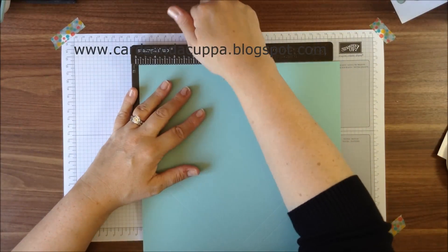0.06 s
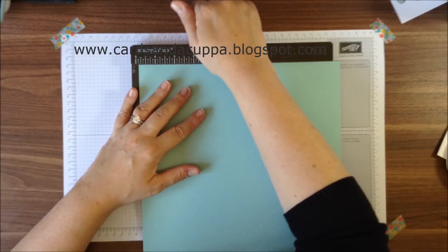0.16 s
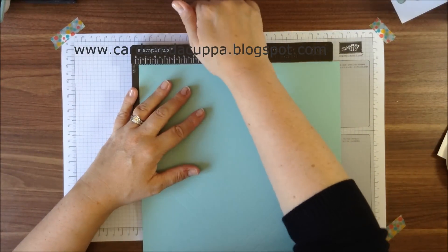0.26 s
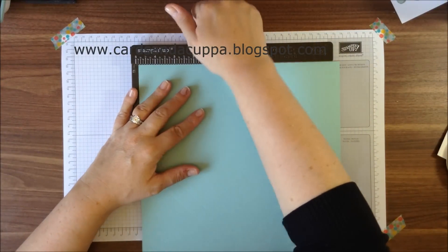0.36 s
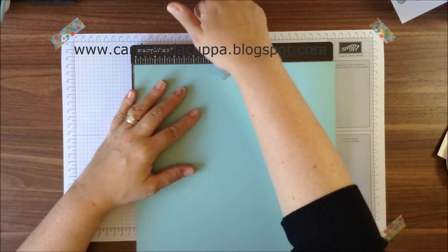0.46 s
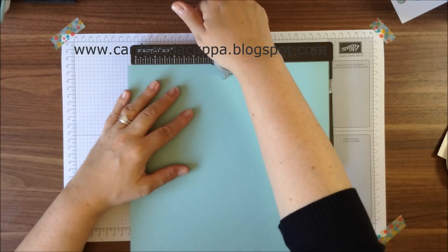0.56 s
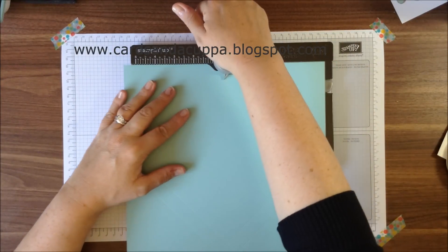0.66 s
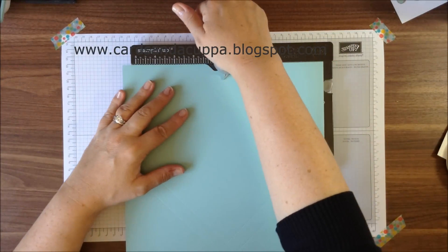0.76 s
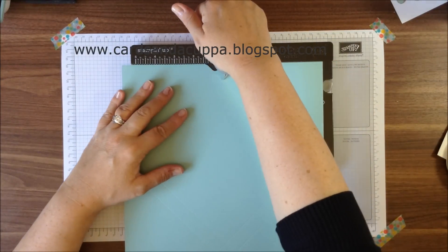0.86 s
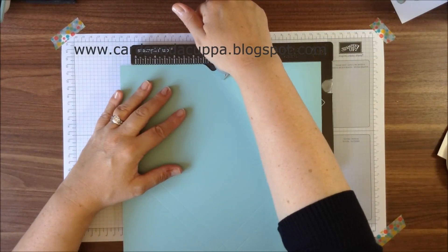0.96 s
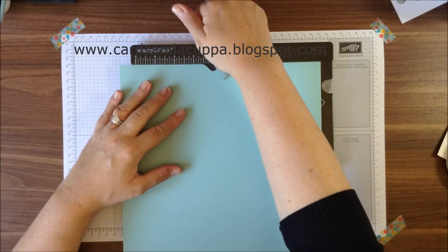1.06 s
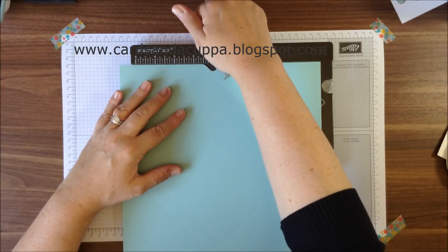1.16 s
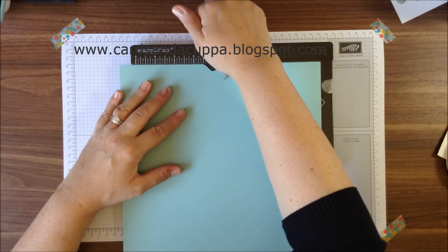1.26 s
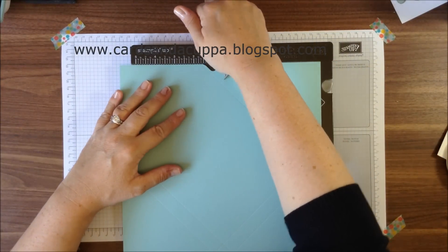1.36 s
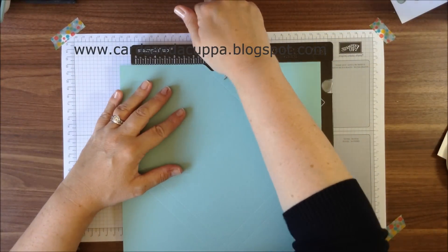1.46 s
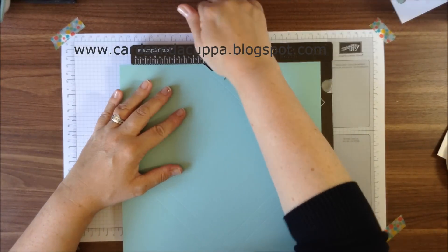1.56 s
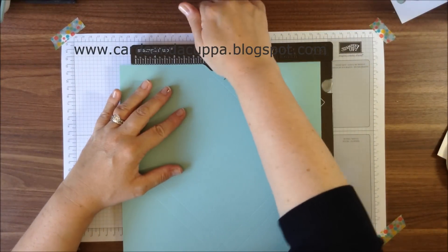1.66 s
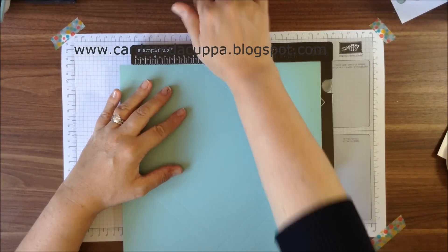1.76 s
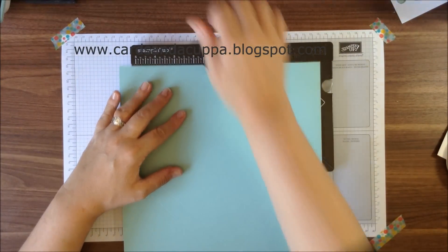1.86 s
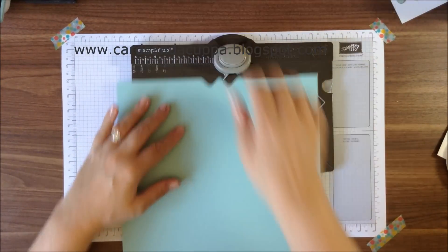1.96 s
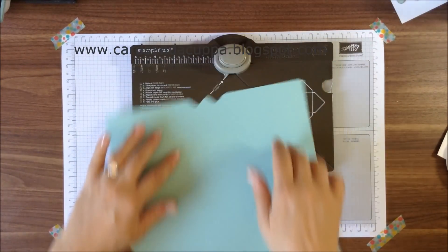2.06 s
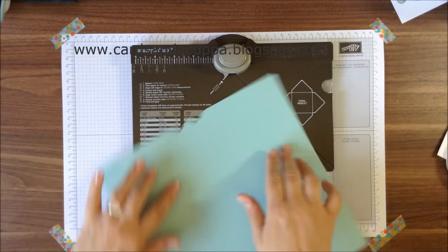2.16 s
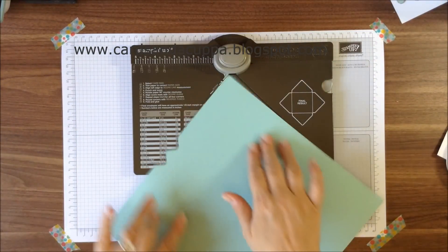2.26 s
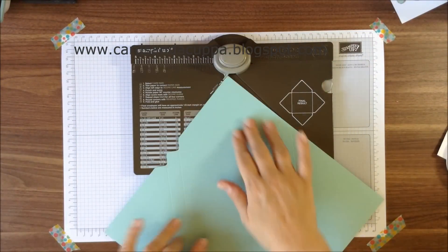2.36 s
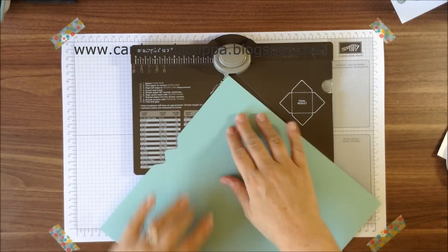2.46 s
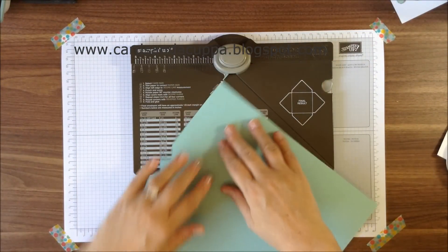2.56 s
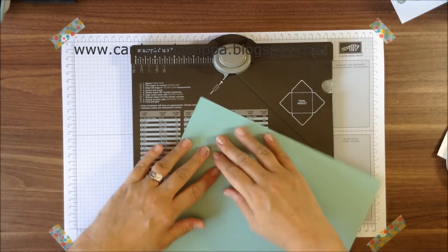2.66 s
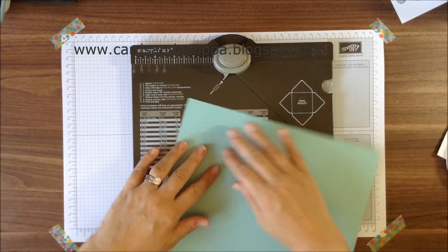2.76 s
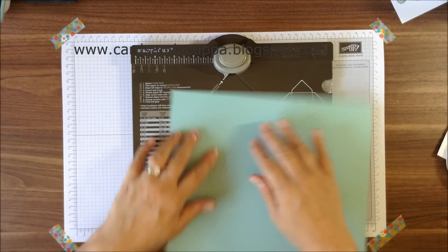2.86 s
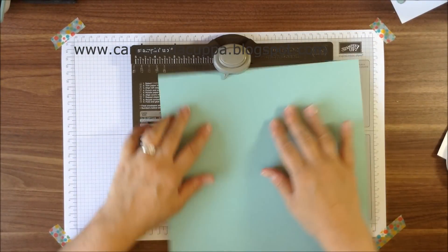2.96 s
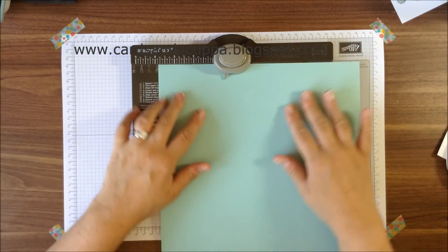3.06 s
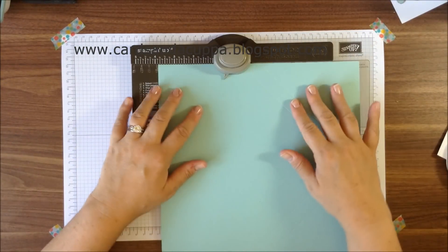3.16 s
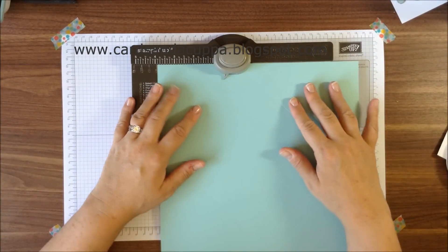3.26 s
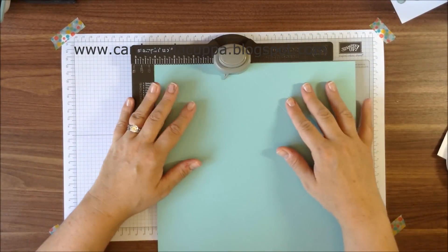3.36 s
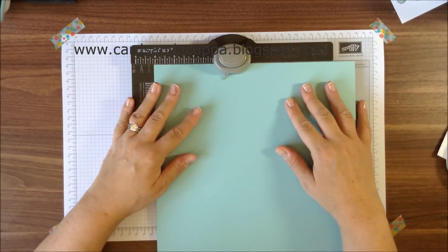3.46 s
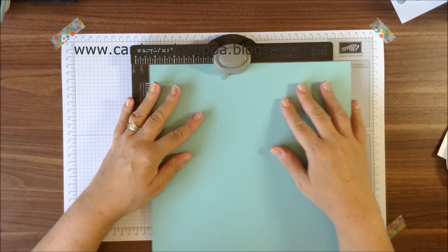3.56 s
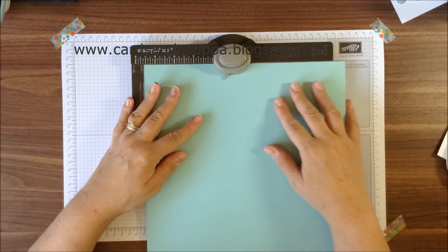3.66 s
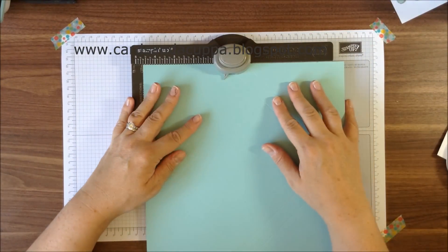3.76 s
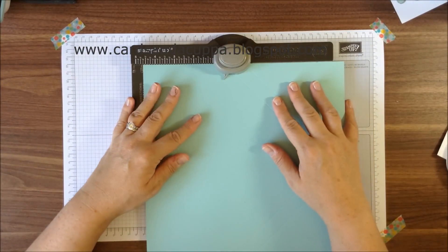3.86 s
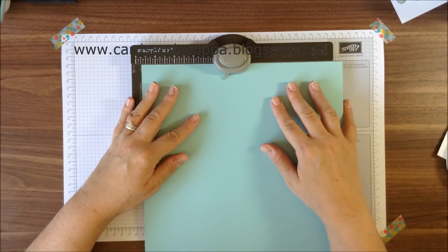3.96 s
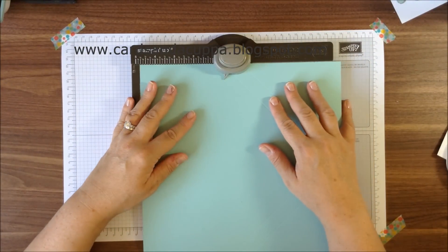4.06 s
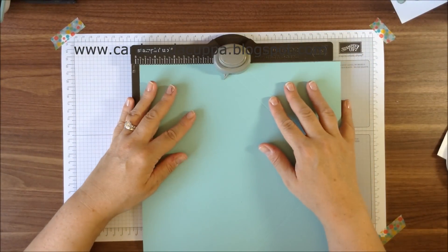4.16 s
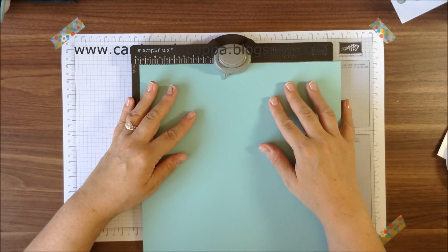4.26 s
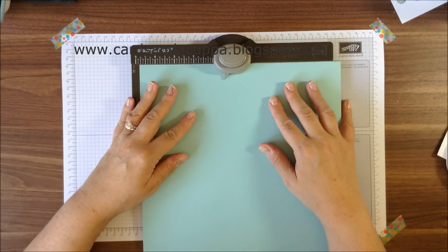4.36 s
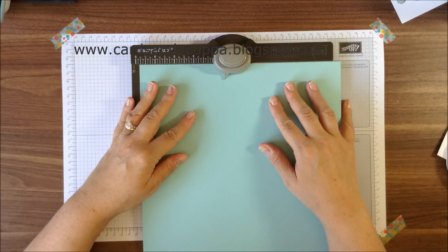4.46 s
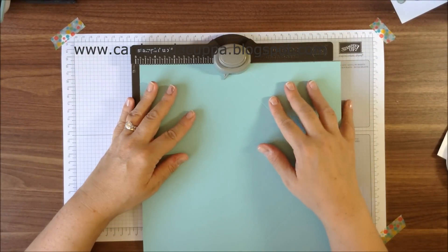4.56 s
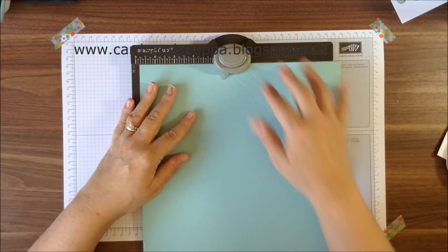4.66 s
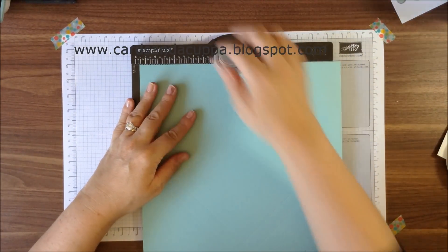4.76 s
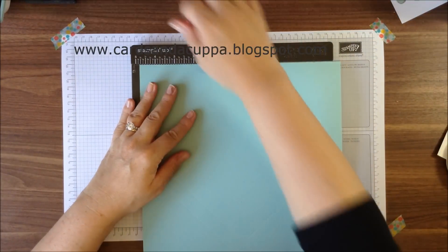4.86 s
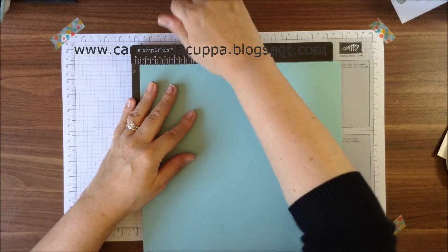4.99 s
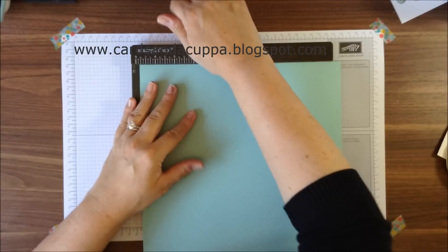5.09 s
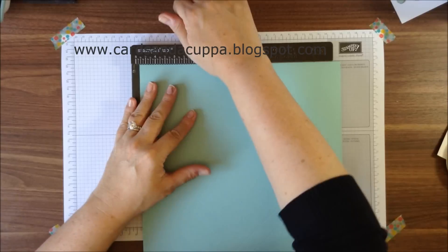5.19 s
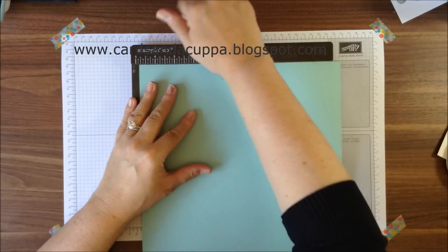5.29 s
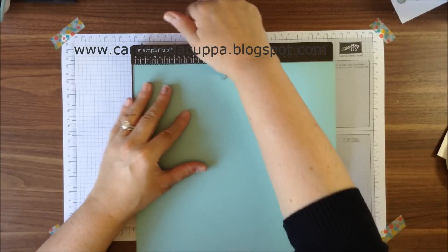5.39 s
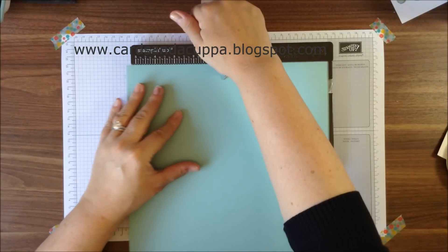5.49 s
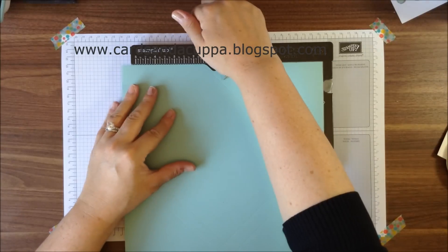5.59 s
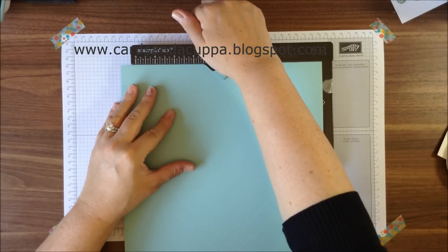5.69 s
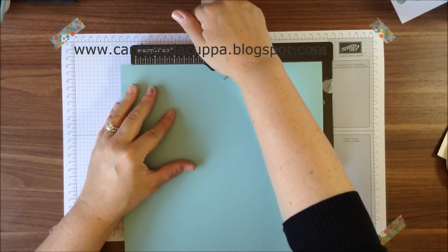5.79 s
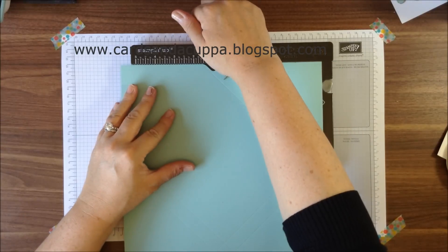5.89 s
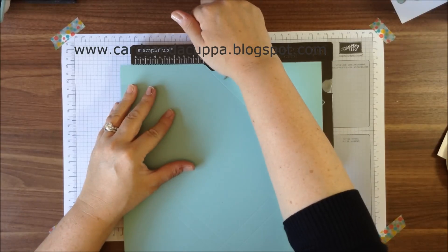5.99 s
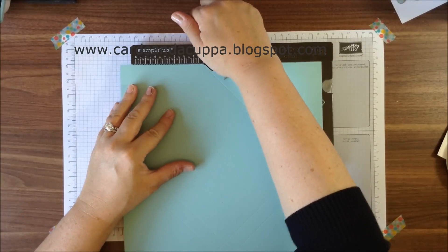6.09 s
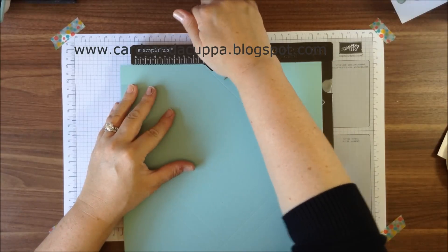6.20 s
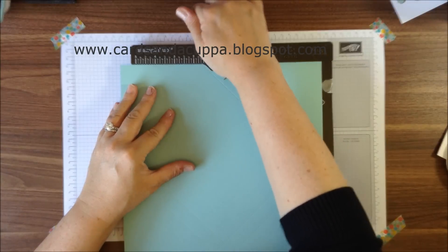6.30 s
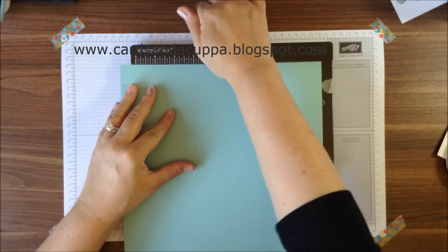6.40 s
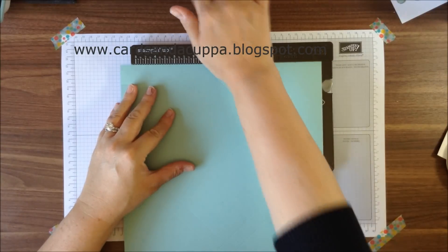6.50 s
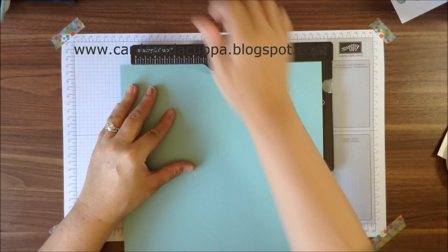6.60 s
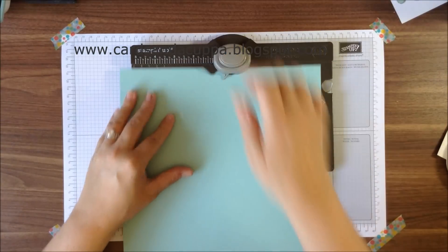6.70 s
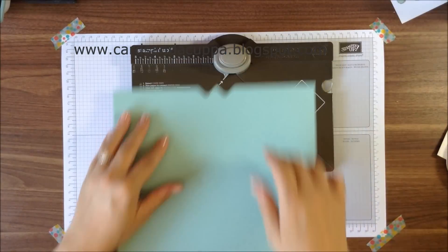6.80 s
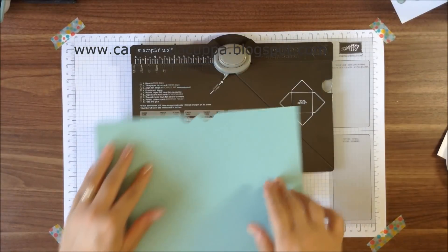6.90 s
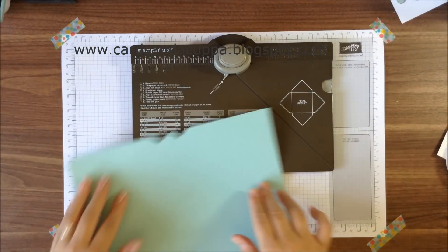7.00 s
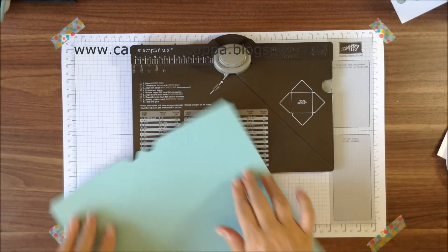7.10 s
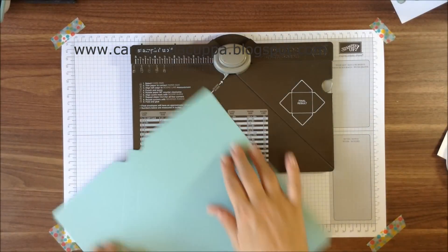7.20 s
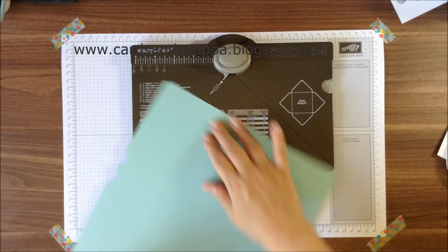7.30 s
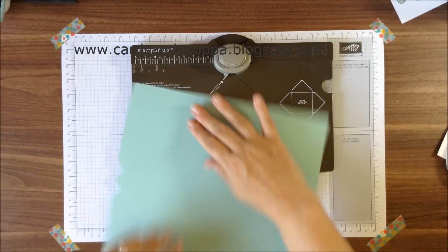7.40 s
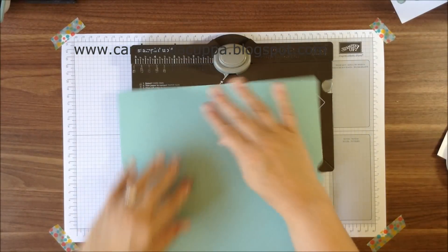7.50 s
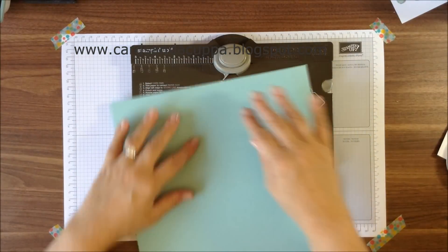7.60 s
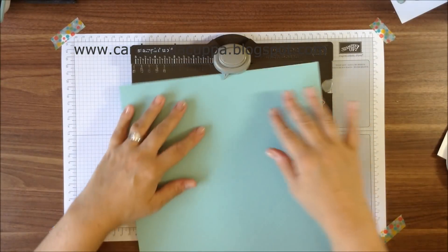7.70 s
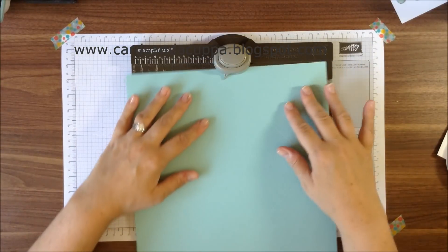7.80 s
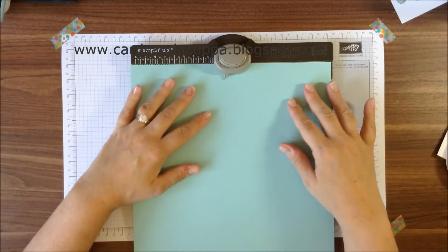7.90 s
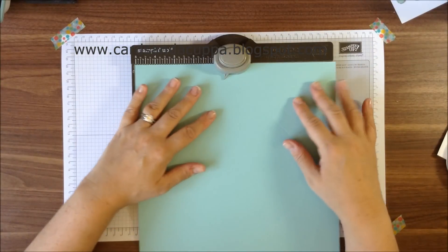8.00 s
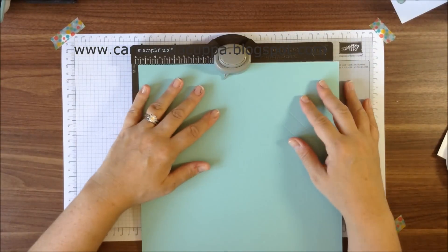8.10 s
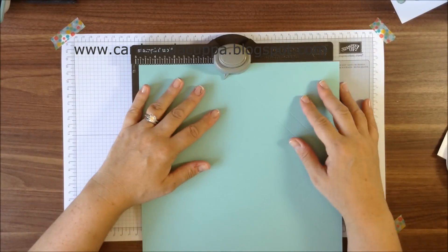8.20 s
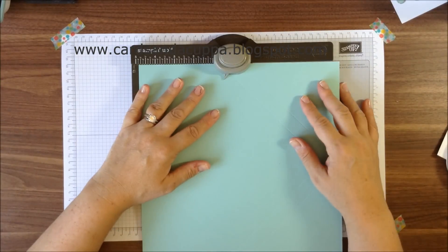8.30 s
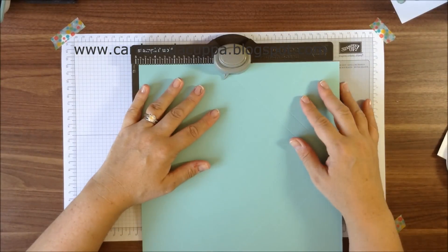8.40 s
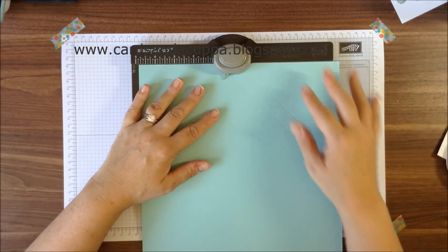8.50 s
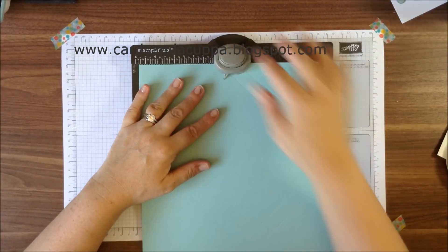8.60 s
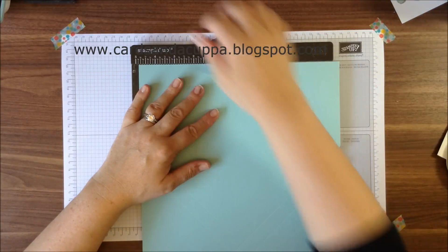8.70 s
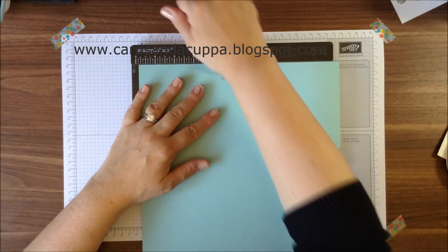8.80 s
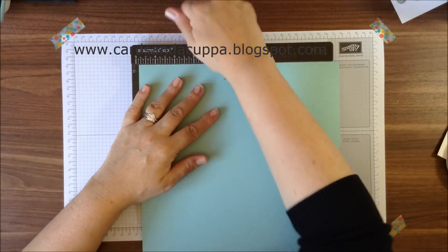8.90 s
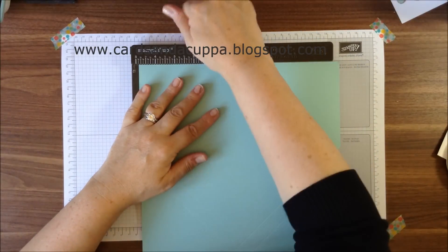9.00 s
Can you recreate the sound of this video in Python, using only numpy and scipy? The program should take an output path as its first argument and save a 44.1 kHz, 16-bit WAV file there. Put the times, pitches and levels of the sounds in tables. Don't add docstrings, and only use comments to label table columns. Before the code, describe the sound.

In a small room, a lever punch crunches loudly through card several times, springing back, while the sheet slides and turns softly on a hollow board.

```python
import sys
import numpy as np
from scipy import signal
from scipy.fft import rfft, irfft, next_fast_len
from scipy.io import wavfile
from scipy.ndimage import uniform_filter1d

SR = 44100
rng = np.random.default_rng(int(sys.argv[2]) if len(sys.argv) > 2 else 0)


def elevation(decibels):
    levels = np.asarray(decibels, float)
    return 10 ** (levels / 20)


def persist_wave(psi):
    counts = np.round(np.clip(psi, -1, 1) * 32767).astype(np.int16)
    wavfile.write(sys.argv[1], SR, np.atleast_2d(counts).T)


N = 399105

# (frequency [Hz], level [dB per Hz])
CRACK_COLOUR = [(300, -35), (1000, -12.5), (1700, -1.5), (2400, 6), (3200, 6.5), (4500, 2.5), (6500, -0.5),
                (9000, -3), (12000, -6), (16000, -12.5)]
# (frequency [Hz], level [dB], time to fade by 60 dB [s])
TABLE_MODES = [(125, -3, 0.19), (192, -2, 0.15), (238, -1.5, 0.09), (328, -9, 0.032), (409, 1.5, .09),
               (493, -1.5, 0.036)]


def level(x, db=0):
    return x * elevation(db) / np.sqrt(np.mean(x ** 2) + 1e-30)


def peak(x):
    return x / np.max(np.abs(x))


def colour(x, points):
    hz, db = np.transpose(points)
    size = next_fast_len(len(x))
    f = np.maximum(np.arange(size // 2 + 1) * SR / size, 1)
    gain = elevation(np.interp(np.log(f), np.log(hz), db))
    return irfft(rfft(x, size) * gain, size)[:len(x)]


def band(x, hz, width_hz):
    return signal.lfilter(*signal.iirpeak(hz, hz / width_hz, fs=SR), x)


def walk(rate):
    hold = int(SR / rate)
    steps = np.repeat(rng.standard_normal(N // hold + 1), hold)
    return level(uniform_filter1d(steps, hold)[:N])


def shears():
    # (time [s], peak [dB], centre of the ring [Hz], crack over ring [dB])
    cuts = [
        (.1835, -13.5, 800, 1),
        (1.5652, -9, 1000, 0),
        (5.1, -10.5, 986, 0.5),
        (6.285, -9.5, 973, 1),
        (8.9955, -9.5, 780, -3),
    ]
    return contacts(cuts, CRACK_COLOUR, thud_db=-13.5, ms=6.8, grit_db=0.5, focus=5.5, rattle_db=-21, jolt=0.13)


def snaps():
    # (time [s], peak [dB], centre of the ring [Hz], crack over ring [dB])
    blows = [(.1855, -6.5, 700, -18), (.2035, -17.5, 1040, -4), (.2079, -2.7, 1000, 0),
             (.2126, -11.5, 1475, -1), (1.5708, -5.5, 1275, -23), (1.5775, -18.5, 795, -11.5),
             (1.5829, -1.2, 1120, -2), (5.1045, -5, 1149, -6.5), (5.1135, -7, 797, -7.5),
             (5.1178, -.5, 1185, -8.5), (6.3405, -9.5, 809.5, -5), (6.345, 0.1, 767.6, 0.5)]
    return contacts(blows, CRACK_COLOUR, thud_db=-15.5, ms=0.91, grit_db=1.32, focus=7.1, rattle_db=-16.5, jolt=1.3)


def returns():
    # (time [s], peak [dB], centre of the ring [Hz], crack over ring [dB])
    clacks = [(.4045, -19.5, 985, -21), (.414, -21, 990, 3.5), (1.779, -43, 1193, -3), (1.796, -31, 730, 0),
              (1.816, -18.5, 700, -5), (1.8265, -13, 1370, 1.5), (5.311, -39, 847, 7.5),
              (5.3345, -25, 1060, -5), (5.3432, -13.5, 960, -5), (5.401, -33, 1100, -2),
              (5.41, -34, 686, -19), (6.539, -19.5, 760, -23), (6.5495, -14, 1210, 1.5)]
    return contacts(clacks, CRACK_COLOUR, thud_db=-34, ms=1.6, grit_db=3.0, focus=8, rattle_db=-15, jolt=1.0)


def presses():
    # (time [s], peak [dB], centre of the ring [Hz], crack over ring [dB])
    clicks = [(.090, -39, 1525, -16), (.105, -29, 1438, 1), (.139, -31.5, 690, -6.5), (.515, -47, 760, 0.5),
              (1.402, -45, 812, -21.5), (1.456, -31.5, 1318, 0.5), (1.480, -39.5, 1026, -2),
              (5.024, -32, 823, -24), (5.031, -19, 1172, -1.5), (5.066, -29.5, 872, -24),
              (6.161, -47.5, 870, -33.5), (6.217, -39.5, 797, 1), (6.228, -35.5, 690, -10),
              (8.899, -39.5, 905, -20), (8.924, -31.5, 880, -4), (8.937, -14, 1204, 1)]
    return contacts(clicks, CRACK_COLOUR, thud_db=-29, ms=2.1, grit_db=2.5, focus=4.4, rattle_db=-15, jolt=0.7)


def knocks():
    # (time [s], peak [dB], centre of the ring [Hz], crack over ring [dB])
    taps = [(2.037, -35.5, 687, -25), (2.326, -18.5, 1100, 1), (2.529, -40, 1720, -19),
            (2.587, -44, 870, 7), (3.0132, -16.5, 867, -3), (3.090, -22.5, 890, -9.5),
            (5.454, -28.5, 760, -12), (5.583, -44, 680, -25), (5.630, -47, 818, -13), (5.885, -72, 902, -4),
            (6.085, -53.5, 2000, -8.5), (6.785, -32, 950, -11.5), (6.826, -36, 870, -19),
            (7.205, -41, 867, 11), (7.254, -42, 815, 8), (7.651, -44, 1810, -12), (7.445, -40, 1690, 6),
            (7.93, -44.5, 870, -10)]
    # (frequency [Hz], level [dB per Hz])
    edge_colour = [(300, -24), (1000, -3), (2000, 3), (3500, 1), (5000, -5.5), (8000, -18), (16000, -22)]
    return contacts(taps, edge_colour, thud_db=-52, ms=2.2, grit_db=2.0, focus=4.0, rattle_db=-13.5, jolt=0.41)


def contacts(rows, edge, thud_db, ms, grit_db, focus, rattle_db, jolt):
    # (frequency [Hz], level [dB], time to fade by 60 dB [s])
    board_modes = [(433.5, -7.5, 0.063), (570, 1.5, 0.011), (704, -5.5, 0.022), (795.6, -3.5, 0.014),
                   (839.4, -0.5, 0.019), (985, -4, 0.012), (1040, -9, 0.024), (1198, -1, 0.024),
                   (1400, 3, 0.0082), (1680, -7.5, 0.024), (1810, -3.5, 0.021), (1830, -6.5, 0.0054),
                   (2390, -2.5, 0.0024), (3240, -11, 0.005)]
    out, t = np.zeros(N + SR), np.arange(SR // 3) / SR
    burst_t = t[:3000]
    u = burst_t * 1000 / ms
    push = u ** 2 * np.exp(2 - 2 * u)
    rattle = elevation(rattle_db) * np.exp(-burst_t / 0.017) * (1 - np.exp(-u ** 2))
    bass_cut = signal.butter(2, 330, "high", fs=SR, output="sos")
    for s, db, hz, crack_db in rows:
        slips = rng.standard_normal(len(u)) * elevation(grit_db * rng.exponential(size=len(u)))
        force = slips * (push + rattle)
        blow = force.copy()
        blow[np.argmax(push)] += jolt * np.sqrt(np.sum(force ** 2))

        board = np.array([*board_modes, (hz, 1.5, 0.012)])
        board[:, 1] -= focus * np.abs(np.log2(board[:, 0] / hz))
        body = signal.fftconvolve(ring(board, t, 1.8), blow)[:len(t)]
        body = signal.sosfilt(bass_cut, body)

        thud = signal.fftconvolve(ring(TABLE_MODES, t, 1.5), push)[:len(t)]
        thud_gain = elevation(thud_db - 0.31 * (db + 13))

        crack = colour(np.pad(force * rng.choice([-1, 1], len(u)), 256), edge)

        i = int((s - ms / 1000) * SR)
        out[i:i + len(t)] += elevation(db) * (peak(body) + thud_gain * peak(thud))
        out[i - 256:i - 256 + len(crack)] += elevation(db + crack_db) * peak(crack)
    return out[:N]


def ring(modes, t, spread_db):
    hz, db, t60 = (column[:, None] for column in np.transpose(modes))
    chance = rng.standard_normal((len(modes), 2))
    hz = hz * (1 + 0.017 * chance[:, :1])
    sign = (-1.) ** np.arange(len(modes))[:, None]
    size = sign * elevation(db + spread_db * chance[:, 1:])
    return np.sum(size * np.sin(2 * np.pi * hz * t) * 1000. ** (-t / t60), axis=0)


def card():
    # (start [s], length [s], scrape [dB], fibre hiss over scrape [dB])
    turns = [(1.91, 0.2, -48.5, 2), (2.023, 0.049, -43, -18), (2.092, 0.16, -44.5, 3.5),
             (2.248, 0.063, -39.5, 7.5), (2.327, 0.11, -64.5, 13), (2.465, 0.14, -53, -2.5),
             (2.573, 0.16, -44.5, 2.5), (2.72, 0.29, -39.5, -1), (3.012, 0.079, -57, 8.5),
             (6.73, 0.12, -43.5, -6), (6.836, .12, -49, 4.5), (6.953, 0.12, -44.5, 2),
             (7.075, 0.13, -47, 6.5), (7.187, .025, -41, -12), (7.258, .12, -42, 6.5),
             (7.352, .04, -41, -14), (7.409, 0.087, -40, -4.5), (7.532, 0.084, -56.5, -9),
             (7.63, 0.089, -51, 2), (7.702, 0.02, -46, -8), (7.752, 0.17, -54, 3.5),
             (7.907, 0.037, -53, -8), (7.97, 0.16, -56.5, .1)]
    # (start [s], length [s], scrape [dB], fibre hiss over scrape [dB])
    nudges = [(0.037, 0.019, -63, -19), (0.46, 0.19, -56.5, 0.5), (0.654, 0.37, -61.5, -19.5),
              (0.87, 0.021, -71, 11), (3.188, 0.28, -56.5, -6), (3.475, .04, -61, 0),
              (3.533, 0.17, -53, -3.5), (3.882, .03, -77.5, 9), (3.975, 0.12, -64, -3.5),
              (4.601, .12, -76.5, 11), (4.871, 0.024, -80, 16), (5.438, 0.18, -56.5, -0.5),
              (6.066, 0.024, -64, -9), (8.136, 0.24, -61.5, -11), (8.49, 0.027, -79, 14),
              (8.55, 0.056, -75, 12), (8.862, 0.054, -62.5, 8.5)]
    # (start [s], length [s], scrape [dB], fibre hiss over scrape [dB])
    rubs = [
        (0.377, 0.029, -40.5, -6.5),
        (5.302, 0.02, -47, 3),
        (6.5, 0.049, -43, -7.5),
    ]
    # (start [s], length [s], rumble [dB])
    drags = [(.74, 0.22, -66), (1.954, 0.33, -73), (2.642, 0.11, -67), (6.958, 0.027, -56.5),
             (7.17, 0.084, -54.5), (7.296, 0.077, -61), (7.696, 0.034, -75)]
    # (frequency [Hz], width [Hz], level [dB])
    scrape_bands = [(717.6, 93, -10), (867, 110, 1.5), (1180, 710, 2.5), (1720, 330, 3.5),
                    (2160, 1200, -3.5), (3300, 710, -9), (4480, 510, -12)]
    # (frequency [Hz], level [dB per Hz])
    fibre_colour = [(800, -32.5), (2000, -4), (3000, -4.5), (4500, -1.5), (7000, -2), (10000, -1.5),
                    (13000, -1), (16000, 0)]

    start, length, db, hiss_db = np.transpose([*turns, *nudges, *rubs])
    pressure = strokes(start, length, db)
    speed = strokes(start, length, db + hiss_db)
    shake = np.hypot(elevation(-35) * pressure, strokes(*np.transpose(drags)))

    grit_db = np.array([[2.3], [1.7], [1.0]])
    grains = rng.standard_normal((3, N)) * elevation(grit_db * rng.exponential(size=(3, N)))
    board_grains, fibre_grains, table_grains = grains
    patch = elevation(1.7 * walk(rate=60))

    scrape = sum(elevation(g + 2 * walk(rate=35)) * level(band(board_grains, hz, w)) for hz, w, g in scrape_bands)
    hiss = colour(fibre_grains, fibre_colour)
    rumble = sum(elevation(g) * level(band(table_grains, hz, 40.)) for hz, g, _ in TABLE_MODES)
    return (pressure * patch * level(scrape, -2.7)
            + speed * patch * level(hiss, -1.9)
            + shake * level(rumble, -1.6))


def strokes(start, length, db):
    rise_share, stop_db_per_s = 0.44, 200
    t, power = np.arange(0, N, 16) / SR, 1e-12
    for s, d, g in zip(start, length, db):
        speed = np.clip((t - s) / (rise_share * d), 0, 1)
        fade_db = stop_db_per_s * np.clip(t - s - d, 0, 1)
        power = power + (speed * elevation(g - fade_db)) ** 2
    return np.interp(np.arange(N) / SR, t, np.sqrt(power))


def room(x):
    # (frequency [Hz], time to fade by 60 dB [s], level [dB])
    echo_bands = [(150, 0.41, 3), (390, 0.15, 3), (1100, 0.25, -3.5), (2380, 0.28, -0.5), (5630, 0.13, -3),
                  (11900, .21, 3)]
    t = np.arange(SR // 2) / SR
    echoes = rng.standard_normal(len(t)) * np.clip(t / 0.0052, 0, 1)
    tail = sum(elevation(db) * band(echoes, hz, hz) * 1000. ** (-t / t60) for hz, t60, db in echo_bands)
    tail = tail / np.sqrt(np.sum(tail ** 2))
    return x + elevation(-7) * signal.fftconvolve(x, tail)[:N]


def microphone_hiss():
    # (frequency [Hz], level [dB])
    hiss_colour = [(18, -77.5), (30, -51.5), (124, -17.5), (161, -11.5), (303, -11), (328, -11), (437, -12),
                   (600, -16.5), (649, -15), (1760, -19.5), (5590, -21.5), (14400, -23), (16000, -38.5)]
    return level(colour(rng.standard_normal(N), hiss_colour), -63)


def scene():
    punch = shears() + snaps() + returns() + presses()
    return room(punch + knocks() + card())[None]


def roll_off(x):
    return signal.sosfilt(signal.butter(12, 16440, fs=SR, output="sos"), x)


def record(dry):
    bass_cut = signal.butter(5, 100, "high", fs=SR, output="sos")
    top_cut = signal.ellip(8, 0.2, 35, 15300, fs=SR, output="sos")
    x = signal.sosfilt(bass_cut, np.clip(dry, -1, 1))
    x = signal.sosfilt(top_cut, x + microphone_hiss())
    return roll_off(np.clip(x, -0.94, 0.94))


dry = scene()
out = record(dry)
persist_wave(out)
```